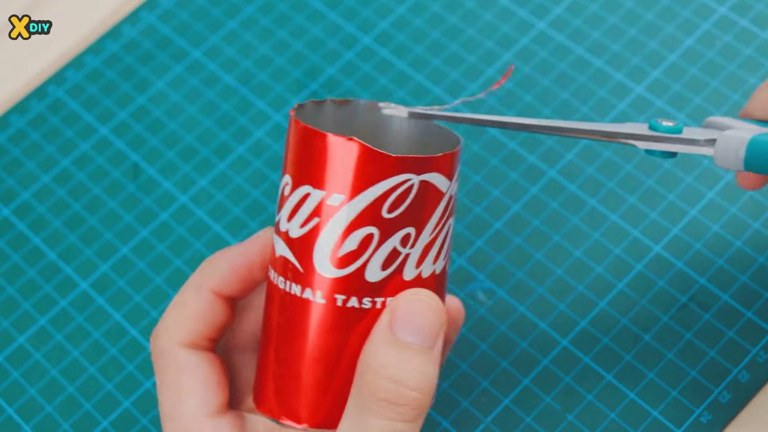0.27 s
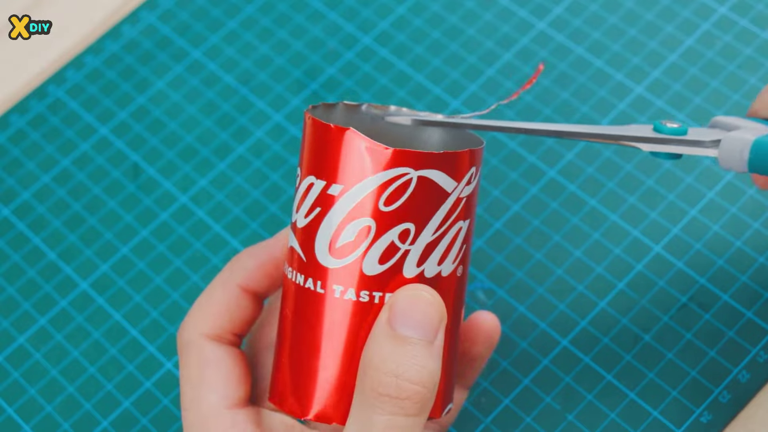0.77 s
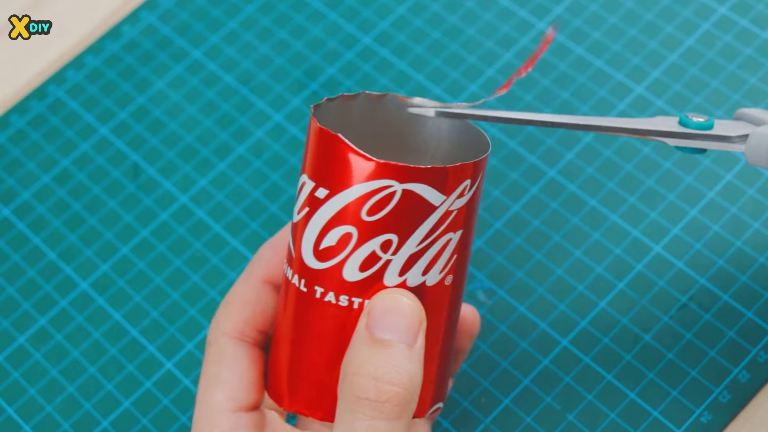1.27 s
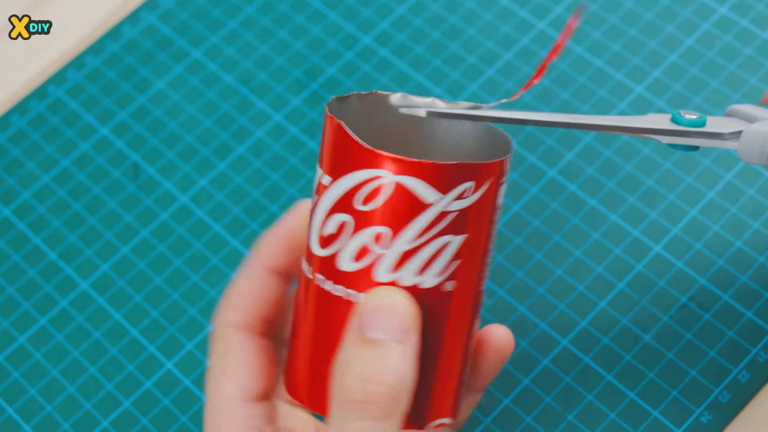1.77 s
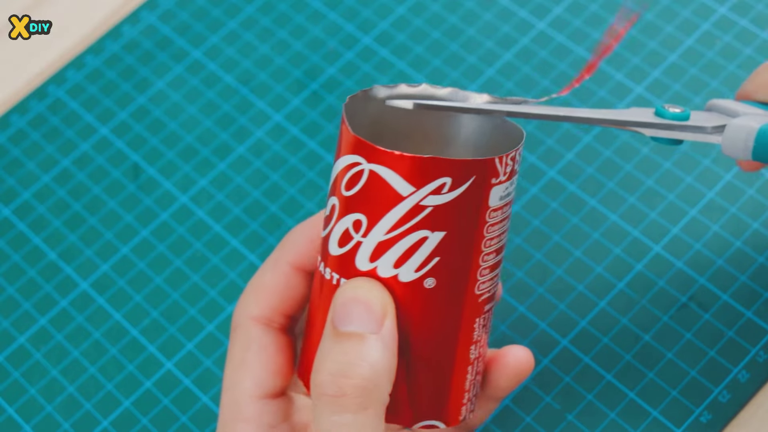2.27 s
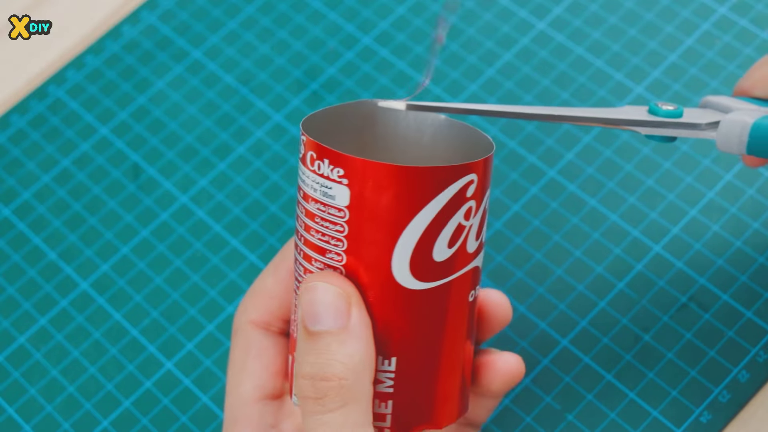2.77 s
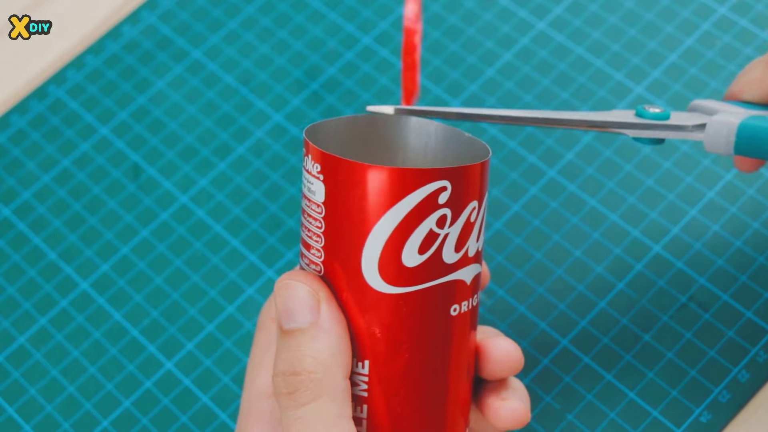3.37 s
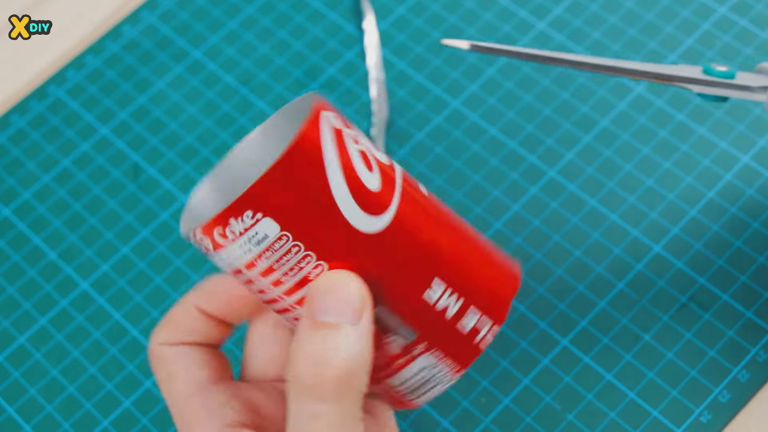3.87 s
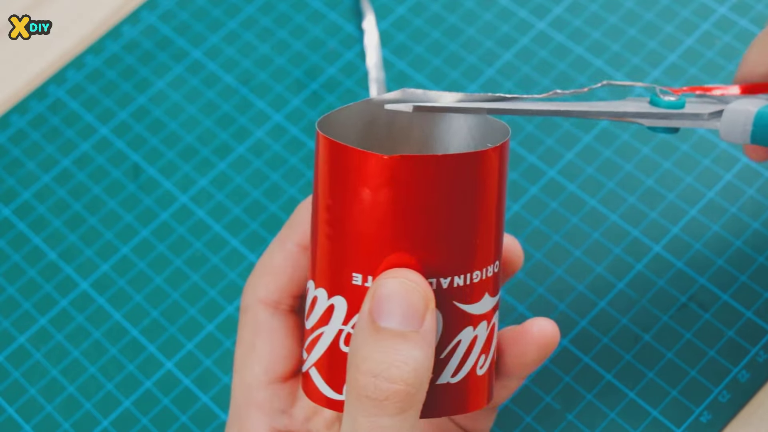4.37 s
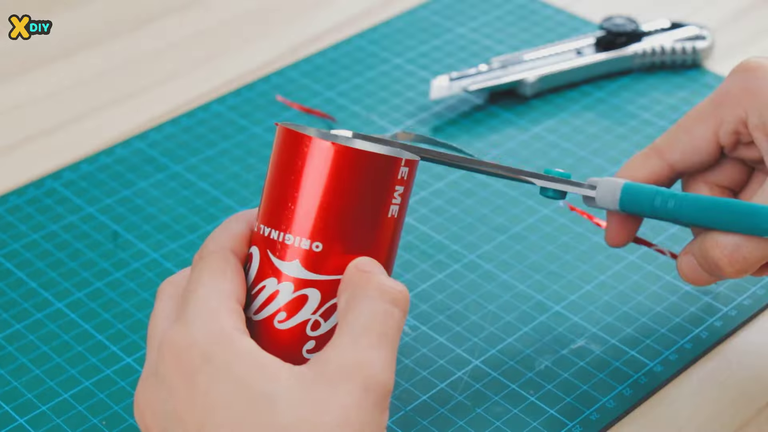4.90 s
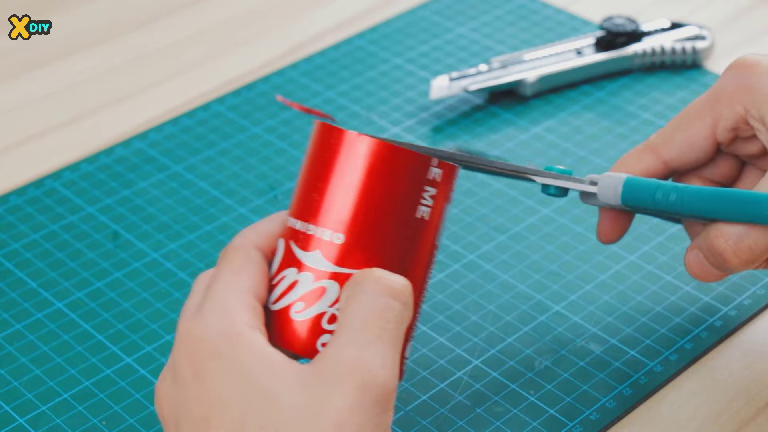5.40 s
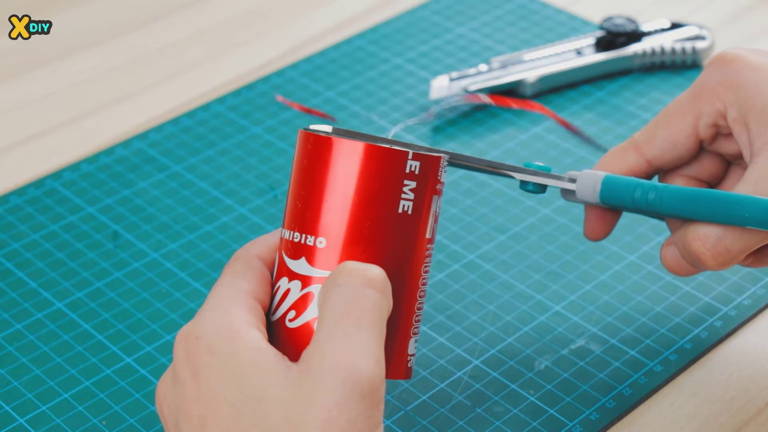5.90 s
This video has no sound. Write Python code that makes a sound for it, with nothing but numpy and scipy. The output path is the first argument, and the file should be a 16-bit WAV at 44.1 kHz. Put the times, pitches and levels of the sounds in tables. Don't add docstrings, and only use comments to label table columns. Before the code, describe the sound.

Close stereo view of scissors trimming a thin empty aluminium can, slightly right of centre. An early sharp snap, a pause, then the loudest burst of crackling snaps with hollow can ring and a table jolt. More snips, gritty scrapes, blade knocks and an offcut tinkle follow, thinning to light rubs. A hard room adds a half-second tail over quiet ventilation.

```python
import sys
import numpy as np
from scipy import signal
from scipy.fft import rfft, irfft, next_fast_len
from scipy.io import wavfile
from scipy.ndimage import uniform_filter1d

SR = 44100
rng = np.random.default_rng(int(sys.argv[2]) if len(sys.argv) > 2 else 0)


def decibels_to_gain(level_db):
    exponent = np.asarray(level_db, float) / 20
    return 10 ** exponent


def wav_out(sig):
    wavfile.write(sys.argv[1], SR, np.round(np.clip(np.atleast_2d(sig).T, -1, 1) * 32767).astype(np.int16))


N = 271038

# pitch in Hz, width in Hz, level in dB.
BLADE_TIP_MODES = [(7460, 800, -1.5), (8610, 840, -1.5), (9530, 600, -2), (10570, 1000, -2.5),
                   (11580, 590, -3.5), (12800, 1000, -6), (14300, 690, -7), (15600, 480, -13.5)]


def rms_one(x):
    return x / np.sqrt(np.mean(x ** 2) + 1e-20)


def at_hz(points, hz):
    points_hz, values = np.transpose(points)
    return np.interp(np.log(hz), np.log(points_hz), values)


def wander(knot_samples):
    knots = np.arange(0, N, knot_samples)
    return np.interp(np.arange(N), knots, rng.standard_normal(len(knots)))


def resonance(x, hz, width_hz):
    r = np.exp(-np.pi * width_hz / SR)
    poles = [1, -2 * r * np.cos(2 * np.pi * hz / SR), r * r]
    return signal.lfilter([1, 0, -1], poles, x + 1e-18) * np.sqrt((1 - r * r) / 2)


def body(modes, drive):
    out, power = 0, 0
    for k, (hz, width_hz, db) in enumerate(modes):
        out = out + (-1) ** k * decibels_to_gain(db) * resonance(drive(hz), hz, width_hz)
        power += decibels_to_gain(2 * db)
    return out / np.sqrt(power)


def bands(low_hz):
    edges_hz = low_hz * 2 ** np.arange(0, np.log2(.45 * SR / low_hz), .5)
    return [(np.sqrt(a * b), signal.butter(2, [a, b], "band", fs=SR, output="sos"))
            for a, b in zip(edges_hz, edges_hz[1:])]


def hush():
    # frequency in Hz, density in dB per Hz.
    spectrum = [(15, -46), (25, -11.5), (74, -29), (111, -13), (190, -16.5), (229, -4), (363, -14.5),
                (405, -6), (1020, -16), (1190, -11), (1290, -18.5), (1440, -12.5), (4610, -37),
                (11900, -34.5), (16000, -60.5)]
    # frequency in Hz, likeness (1 = identical).
    likeness = [(40, 0.74), (180, 1), (550, 0.74), (1650, 0.079), (5000, .15), (15000, .1)]
    # pitch in Hz, width in Hz, rms level in dB.
    whines = [(223.5, 7.1, -75), (1417, 0.64, -76), (1200, 13, -79)]
    hush_db = -62.5
    white, out = rng.standard_normal((2, 2, N)), 0
    for k, (hz, sos) in enumerate(bands(low_hz=22.9)):
        mid, side = signal.sosfilt(sos, white[k % 2])
        alike = np.clip(at_hz(likeness, hz), -1, 1)
        stereo = np.sqrt(1 + alike) * mid + np.sqrt(1 - alike) * side * [[1], [-1]]
        out = out + decibels_to_gain(at_hz(spectrum, hz)) * stereo
    span = signal.butter(4, [45, 12300], "band", fs=SR, output="sos")
    out = decibels_to_gain(hush_db) * rms_one(signal.sosfilt(span, out))
    for hz, width_hz, db in whines:
        once = resonance(rng.standard_normal(N), hz, width_hz)
        out = out + decibels_to_gain(db) * rms_one(resonance(once, hz, width_hz))
    return out


def room(x):
    # frequency in Hz, time to fall 60 dB in seconds.
    t60_s = [(300, 1), (800, 0.19), (2100, 0.42), (5500, 0.45), (10000, 0.44), (14600, 0.083)]
    t = np.arange(int(.9 * SR)) / SR
    white, tail = rng.standard_normal((2, 2, len(t))), 0
    for k, (hz, sos) in enumerate(bands(low_hz=153.3)):
        tail = tail + signal.sosfilt(sos, white[k % 2]) * decibels_to_gain(-60 * t / at_hz(t60_s, hz))
    early = 1 + 2.7 * np.exp(-t / 0.004)
    tail = tail * early * np.clip((t - .0015) / 0.00099, 0, 1)
    return signal.fftconvolve(x[None], tail / np.sqrt(np.sum(tail ** 2) / 2), axes=1)[:, :N]


def grit(per_s, spread_db):
    sizes = decibels_to_gain(spread_db * np.minimum(rng.exponential(1, N), 2)) * rng.choice([-1, 1], N)
    clumps = decibels_to_gain(2.2 * wander(256))
    return rms_one(clumps * sizes * (rng.random(N) < per_s / SR))


def cracks(count):
    x = np.arange(512) / SR / .0012
    shape = x ** 1.3 * np.exp(1.3 * (1 - x))
    crack = rng.standard_normal((count, 512))
    for _ in range(12):
        spectrum = rfft(crack * shape)
        crack = irfft(spectrum / (np.abs(spectrum) + 1e-12), 512)
        crack = crack / np.sqrt(uniform_filter1d(crack ** 2, size=24, axis=1) + 1e-9)
    return crack * shape


def levels(rows, rise_db=0, way=1, edge_s=0.0025):
    sag_db, release_db_per_s = 15.5, 304.5
    gains = np.zeros((len(rows[0]) - 2, N))
    for s, hold_s, *columns_db in rows:
        span = np.arange(int((hold_s + .2) * SR))
        where = np.clip(int(s * SR) + way * span, 0, N - 1)
        t = span / SR
        done = np.minimum(t / hold_s, 1)
        shape_db = -sag_db * done - release_db_per_s * np.maximum(t - hold_s, 0)
        level_db = np.array(columns_db)[:, None] + shape_db + np.outer(rise_db, done)
        gains[:, where] += np.minimum((t + 1 / SR) / edge_s, 1) * decibels_to_gain(level_db)
    return gains


def flexing():
    # start in seconds, hold in seconds, air-column dB, base dB.
    flexes = [
        (0.38, 0.055, -57, -67),
        (0.48, 0.025, -72, -65),
        (1.428, 0.16, -41, -54),
        (2.14, 0.23, -50, -51),
        (3.09, 0.16, -60.5, -64),
        (3.364, 0.015, -60, -57),
        (4.105, 0.21, -58.5, -50.5),
        (4.774, 0.019, -47.5, -35.5),
    ]
    # start in seconds, hold in seconds, level in dB.
    shakes = [
        (1.422, 0.073, -57),
    ]
    # pitch in Hz, width in Hz, level in dB.
    air_modes = [(319, 50, -3.5), (400, 90, 1), (624.2, 180, -4)]
    base_modes = [(740, 43, -2.5), (970, 300, 0.55)]
    table_modes = [(36, 14, 0.00032), (130, 43, 0.0039)]
    air, base, shake = np.vstack([levels(flexes), levels(shakes)]) * grit(per_s=990, spread_db=-0.5)
    creak = decibels_to_gain(0.5) * (body(air_modes, lambda hz: air) + body(base_modes, lambda hz: base))
    return creak, body(table_modes, lambda hz: shake)


def strip():
    # start in seconds, hold in seconds, level in dB.
    tinkles = [
        (3.505, 0.069, -38.5),
        (3.61, 0.14, -54.5),
        (4.317, .012, -35),
        (4.345, .09, -70),
    ]
    ticks = levels(tinkles)[0] * grit(per_s=1500, spread_db=4.5)
    modes = [(hz, width_hz / 2.0, 0.88 * np.log2(hz / 8000)) for hz, width_hz, db in BLADE_TIP_MODES]
    return decibels_to_gain(-8) * body(modes, lambda hz: ticks * decibels_to_gain(6.7 * wander(1024)))


def knocks():
    # time in seconds, peak in dB.
    knock_rows = [(1.4248, -18), (2.4316, -45), (2.609, -50), (2.6255, -54.5), (2.796, -54), (3.027, -69),
                  (3.0696, -35), (3.9852, -34), (4.1282, -32.5), (4.4021, -47.5), (4.449, -29.5),
                  (4.806, -37)]
    s, peak_db = np.transpose(knock_rows)
    where = (s * SR).astype(int)[:, None] + np.arange(512)
    force = np.zeros(N + 512)
    np.add.at(force, where, cracks(count=len(s)) * decibels_to_gain(peak_db)[:, None])
    return resonance(force[:N], hz=5900, width_hz=380)


def favour(hz, favoured_hz):
    off_octaves = np.log2(hz / favoured_hz)
    return decibels_to_gain(12.7 * np.exp(-.5 * (off_octaves / 0.17) ** 2) - 8.0)


def strokes():
    # start in seconds,
    # hold in seconds, blade-tip dB, can wall against it in dB, favoured rim pitch in Hz.
    grinds = [(0.368, 0.13, -42, -6, 3540), (1.425, 0.092, -36.5, 6.5, 2660),
              (1.553, 0.12, -43.5, 6.5, 2450), (1.702, 0.054, -59, 11, 2210),
              (1.847, 0.016, -37, -8.5, 2840), (2.148, 0.16, -36.5, -9.5, 2650),
              (2.405, 0.038, -50, -3, 2470), (3.084, 0.069, -41.5, -3.5, 4070),
              (3.354, 0.078, -41.5, -5, 2480), (3.498, 0.054, -43, -17.5, 3700),
              (3.608, 0.067, -56.5, -24, 2760), (4.073, 0.1, -38, -12.5, 3070),
              (4.154, 0.14, -43.5, -3, 2650), (4.332, 0.29, -53.5, -8, 3020),
              (4.46, 0.058, -46, -2.5, 2960), (5.331, 0.044, -40.5, -4.5, 2840),
              (5.496, 0.083, -46, -16, 3420)]
    rubs = [(0.06, 0.048, -61.5, -8, 2550), (0.15, .015, -71, -16, 2380), (1.07, .05, -69, -13, 3150),
            (1.35, .02, -82, 2, 4020), (1.759, 0.12, -54.5, -3, 2500), (2.585, 0.089, -62, -10, 2840),
            (2.762, 0.071, -63, -8.5, 2280), (3.345, 0.044, -55, -3, 3060), (3.982, 0.095, -51, -1, 3020),
            (4.652, 0.044, -53.5, -7.5, 2880), (4.985, 0.05, -62, -9, 3380),
            (5.699, 0.021, -57, -0.5, 2710), (5.837, .14, -57.5, -16.5, 3650),
            (6.035, 0.065, -71, -2.5, 3120), (6.077, 0.072, -53.5, -13, 3100)]
    # break in seconds, swell in seconds, blade-tip dB,
    # can wall against it in dB, favoured rim pitch in Hz.
    bites = [
        (1.851, 0.029, -53, -11.5, 2820),
        (3.368, 0.0094, -47, 1.5, 2400),
        (4.783, 0.0096, -38.5, 5.5, 2700),
        (5.504, 0.16, -49, -9, 3300),
    ]
    # strongest in seconds, half length in seconds,
    # rim dB, blade-root dB.
    scrapes = [(0.89, .03, -82, -71.5), (1.64, 0.11, -55, -65), (2.21, 0.047, -40, -62.5),
               (4.21, 0.1, -47, -62.5), (2.62, 0.028, -59.5, -61), (2.8, 0.035, -77.5, -63),
               (3.348, 0.0051, -46, -57), (4.83, 0.029, -67, -50), (4.7, 0.054, -81, -60),
               (5.5, 0.029, -44, -48), (5.72, 0.028, -67, -64.5), (5.97, .07, -92, -67.5)]
    # share of the wall's gain, own offset in dB.
    shares, offsets_db = np.array([0, 1, .4, .3]), np.array([0, 0, -2, -0.5])
    wall_rings_on_db = 3.5

    def parts(rows):
        return [(s, hold_s, *(db + shares * wall_db + offsets_db)) for s, hold_s, db, wall_db, hz in rows]

    gains = levels(parts(grinds + rubs), wall_rings_on_db * shares) + levels(parts(bites), way=-1)
    gains[2:] += levels(scrapes, edge_s=1 / SR) + levels(scrapes, way=-1, edge_s=1 / SR)
    grip = [(s + hold_s / 2, hz) for s, hold_s, db, wall_db, hz in grinds + rubs]
    grip += [(s - swell_s / 2, hz) for s, swell_s, db, wall_db, hz in bites]
    return gains, np.interp(np.arange(N) / SR, *np.transpose(sorted(grip)))


def can_and_blades():
    # time in seconds, peak in dB, then against it wall dB, rim dB,
    # favoured rim pitch in Hz.
    snaps = [(0.3499, -12, -32.5, -22, 3570), (0.7072, -26.5, -21, -19.5, 3280),
             (1.4235, -5, -25.5, -19.5, 4200), (1.4313, -20.5, -2.5, -6.5, 2940),
             (1.4704, -11.5, -19, -10, 3060), (1.4793, -22, 0.5, -9, 2380), (1.5052, -26.5, 1, -5, 2460),
             (1.5151, -22.5, -10.5, -2, 2430), (1.5243, -23.5, 1, 1.5, 2350), (1.5381, -24, -9, -26, 2200),
             (1.836, -38, -29, -8, 4000), (1.8581, -35.5, -14.5, -11, 2600),
             (2.1366, -12, -24.5, -12.5, 3110), (3.0706, -30.5, -10, -4.5, 3235),
             (3.365, -29.5, 0, -11, 2130), (3.3697, -24, -24, -5.5, 1917), (3.5048, -41, -39.5, -21, 4150),
             (4.105, -28, -10, -17, 2870), (4.1289, -28.5, -8, -5.5, 2860), (4.3165, -29, -36, -12.5, 2620),
             (4.449, -24.5, -11, -5.5, 3500), (4.4809, -33.5, -2.5, -10.5, 4130),
             (4.766, -36.5, 2.5, -8, 2540), (4.7822, -21, -13.5, -7, 2200)]
    # time in seconds, peak in dB, then against it
    # wall dB, rim dB.
    tick_rows = [(0.7344, -44.5, -4.5, -4), (0.904, -70, -3, -10.5), (1.0787, -79, 1, -6),
                 (1.3484, -74.5, -2.5, 11), (1.723, -36, -19, -4.5), (1.7449, -41.5, 0, -5.5),
                 (1.7914, -44, -4.5, -19), (2.4078, -40.5, -24.5, -6), (2.4329, -43, -15.5, -2.5),
                 (2.6084, -47, -21.5, -16), (2.7636, -56, -13, -12), (3.3888, -37.5, -18.5, -3),
                 (3.6025, -54, -21, -22.5), (3.9844, -40, -17, 0.5), (3.993, -43, -22.5, -22),
                 (4.028, -33.5, -12, -15.5), (4.079, -31, -31, -28), (4.4028, -49, -9, -5),
                 (4.5204, -45.5, -5, -5), (4.626, -48, -22, -20), (4.6605, -46.5, -21.5, -25),
                 (4.696, -44, -18, -17), (4.7123, -47, -5, -7), (4.744, -47, 2.5, -15),
                 (4.985, -50, -24, -9.5), (5.3291, -39, -5.5, -5), (5.3404, -35.5, -8.5, -18),
                 (5.841, -64.5, -14, -9.5), (5.863, -48, -17.5, -7), (6.08, -69.5, -17, -14)]
    # pitch in Hz,
    # width in Hz, level in dB.
    wall_modes = [(1227, 120, -4), (1257, 99, -2.5), (1386, 160, -2), (1699, 140, -6.5), (1862, 200, -11.5)]
    free_wall_modes = [(1240.2, 16, 2), (1280, 5.8, -4.5), (1405, 22, -5.0), (2180, 81, -8), (2438, 16, -4)]
    rim_modes = [(2137, 240, -4.5), (2417, 120, -4), (2650, 200, -5.5), (3150, 110, -5), (3394, 410, -3),
                 (4200, 410, -0.5)]
    root_modes = [(4534, 270, -10.5), (5330, 710, -4), (5770, 480, -3), (6630, 670, -3)]

    (tip, wall, rim, root), stroke_hz = strokes()
    ticks = [(*row, stroke_hz[int(row[0] * SR)]) for row in tick_rows]
    s, peak_db, wall_db, rim_db, snap_hz = np.transpose(snaps + ticks)
    root_db = -15.5 - 0.26 * peak_db
    where = np.round(s * SR).astype(int)[:, None] + np.arange(512)
    crack, slips = cracks(count=len(s)), grit(per_s=5000, spread_db=1.5)

    def drive(snap, grind):
        force = np.zeros(N + 512)
        luck_db = 1.8 * rng.standard_normal(len(s))
        np.add.at(force, where, crack * (snap * decibels_to_gain(peak_db + luck_db))[:, None])
        return force[:N] + decibels_to_gain(-2.0 + 2 * wander(2048)) * grind * slips

    def wall_drive(gain_db):
        return lambda hz: drive(decibels_to_gain(wall_db + gain_db), wall)

    def rim_drive(hz):
        return drive(decibels_to_gain(rim_db + 3) * favour(hz, snap_hz), rim * favour(hz, stroke_hz))

    def tip_drive(hz):
        dull_db = -12.5 * max(np.log2(hz / 11000), 0)
        return drive(decibels_to_gain(-5.0), tip * decibels_to_gain(dull_db))

    return (body(wall_modes, wall_drive(0.5))
            + decibels_to_gain(-5.5) * body(free_wall_modes, wall_drive(0))
            + body(rim_modes, rim_drive)
            + body(root_modes, lambda hz: drive(decibels_to_gain(root_db), root))
            + body(BLADE_TIP_MODES, tip_drive))


def scene():
    creak, shake = flexing()
    near = can_and_blades() + creak + strip() + knocks()
    lag_samples = 0.34
    size = next_fast_len(N)
    turn = np.exp(-2j * np.pi * np.fft.rfftfreq(size) * lag_samples)
    late = irfft(rfft(near, size) * turn, size)[:N]
    lean = decibels_to_gain([[-1.2], [1.2]])
    return lean * (np.array([late, near]) + decibels_to_gain(-2) * room(near)) + shake + hush()


def band_limit(x):
    return signal.sosfilt(signal.butter(12, 17000, fs=SR, output="sos"), x)


def record(dry):
    ceiling = 1.2
    top = signal.butter(10, 15600, fs=SR, output="sos")
    mix = ceiling * np.tanh(signal.sosfilt(top, dry) / ceiling)
    return band_limit(mix)


dry = scene()
out = record(dry)
wav_out(out)
```